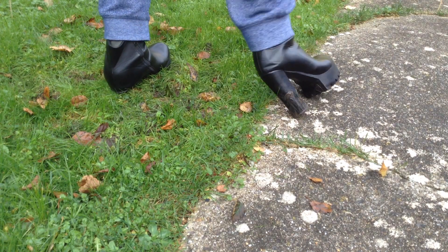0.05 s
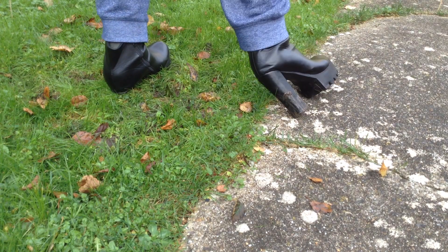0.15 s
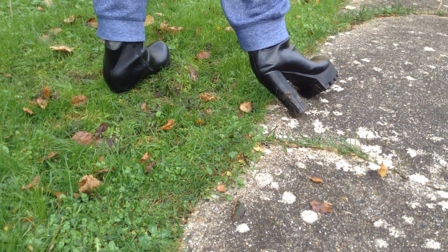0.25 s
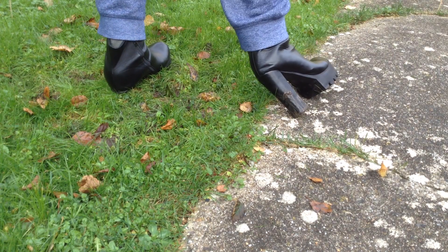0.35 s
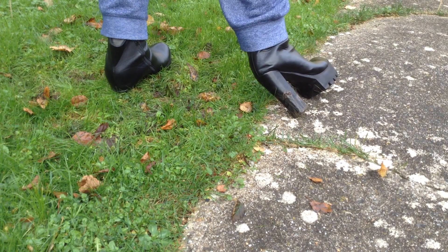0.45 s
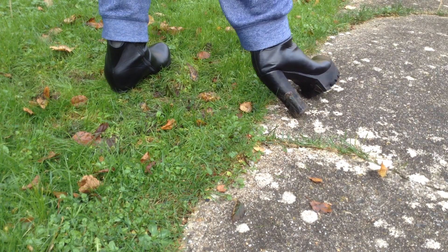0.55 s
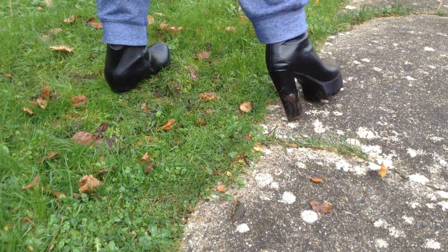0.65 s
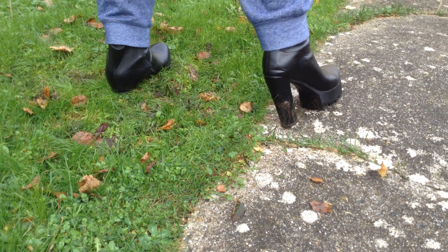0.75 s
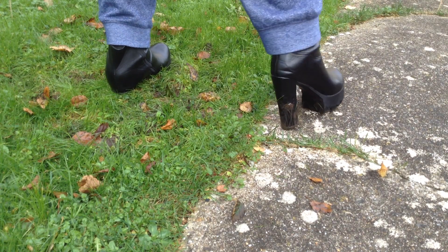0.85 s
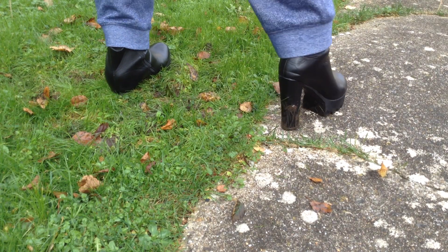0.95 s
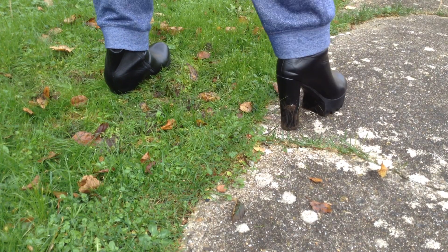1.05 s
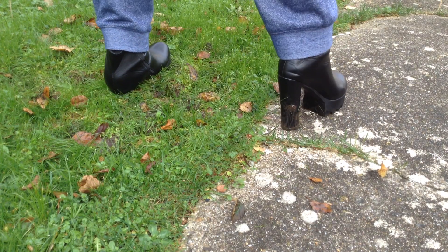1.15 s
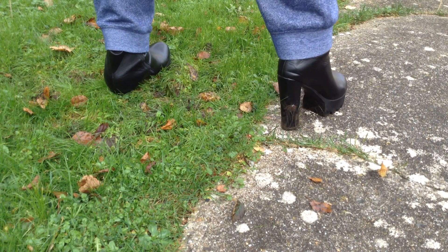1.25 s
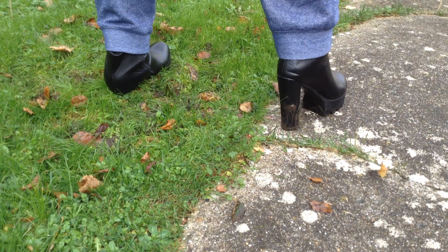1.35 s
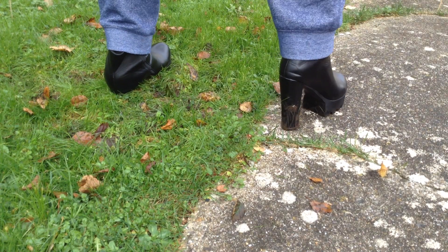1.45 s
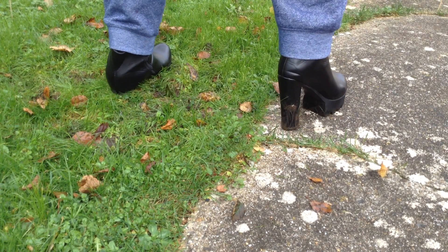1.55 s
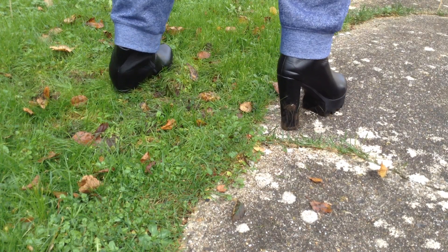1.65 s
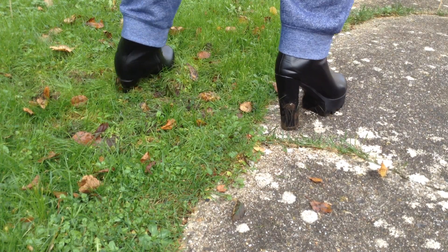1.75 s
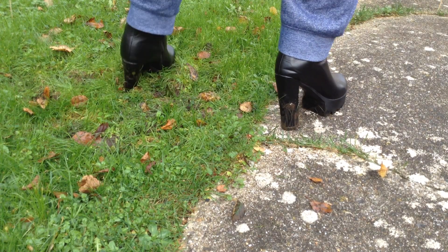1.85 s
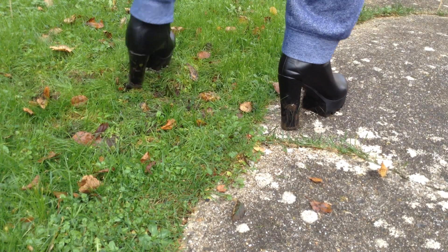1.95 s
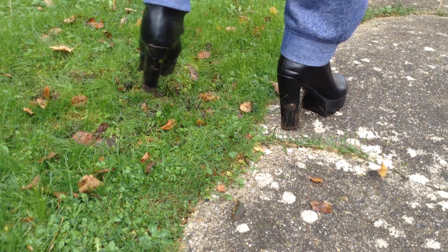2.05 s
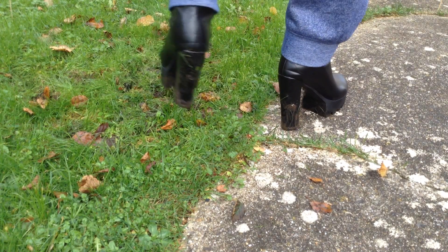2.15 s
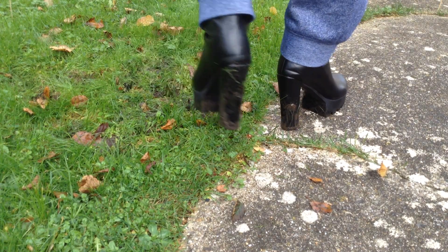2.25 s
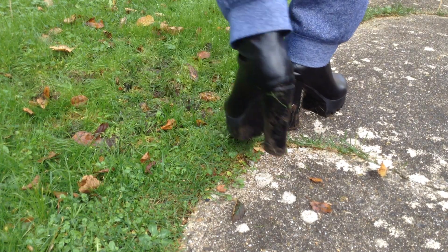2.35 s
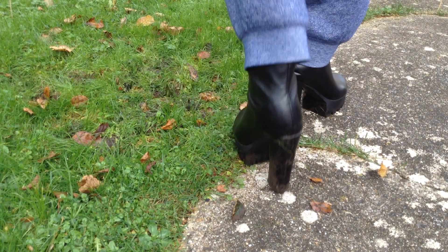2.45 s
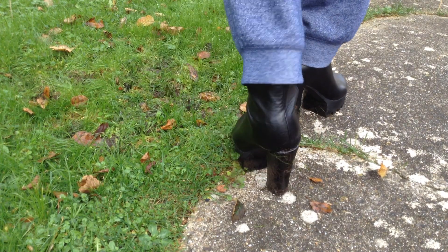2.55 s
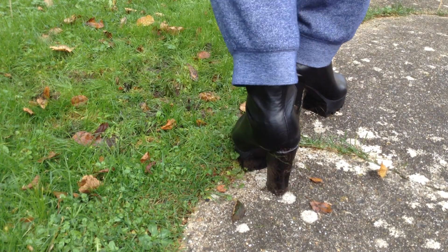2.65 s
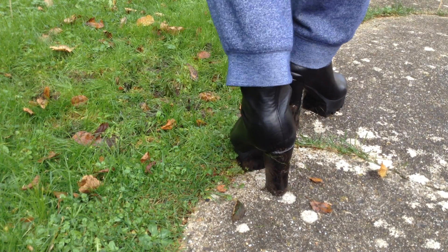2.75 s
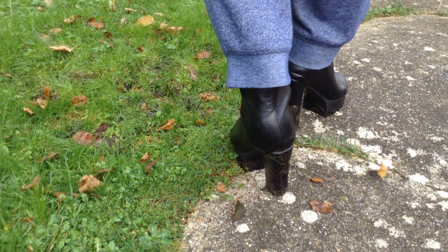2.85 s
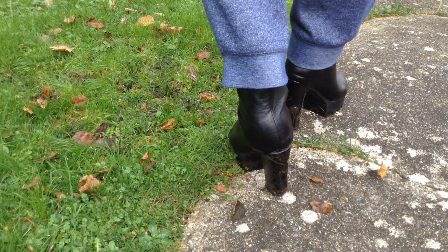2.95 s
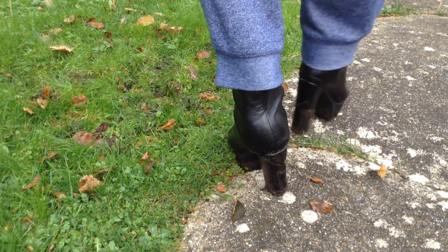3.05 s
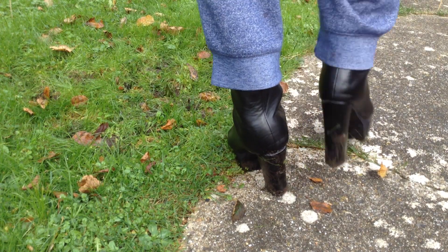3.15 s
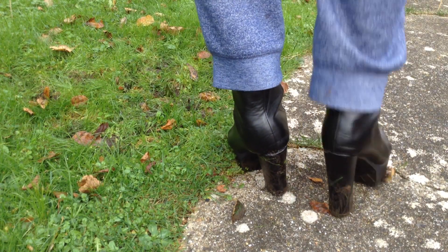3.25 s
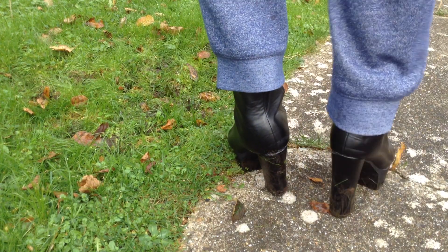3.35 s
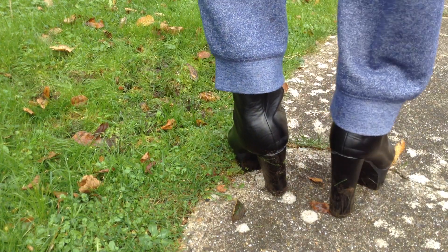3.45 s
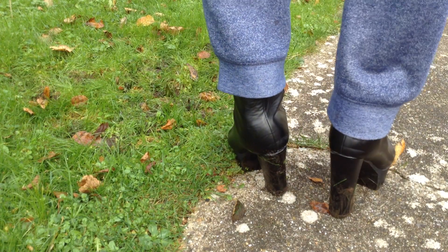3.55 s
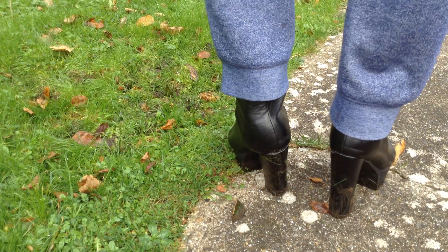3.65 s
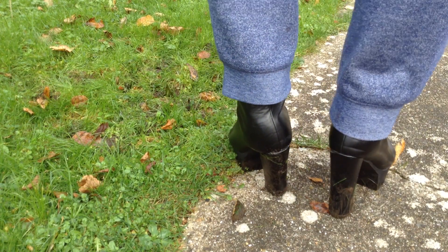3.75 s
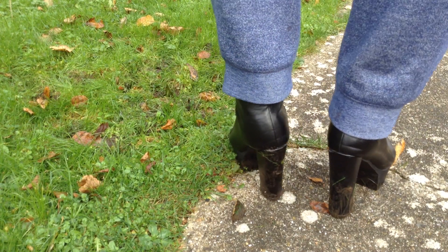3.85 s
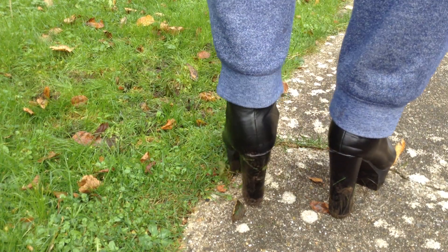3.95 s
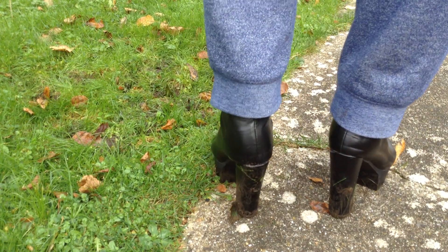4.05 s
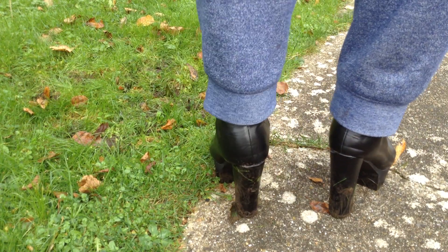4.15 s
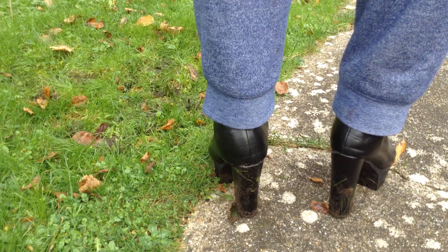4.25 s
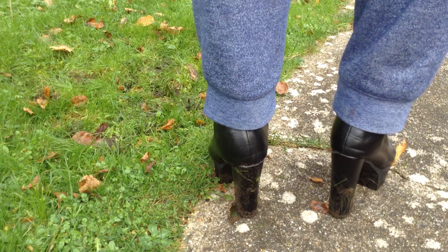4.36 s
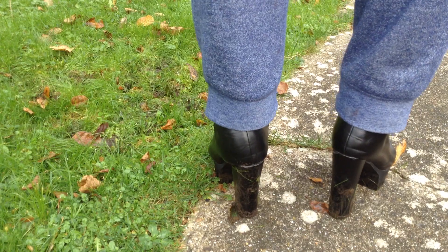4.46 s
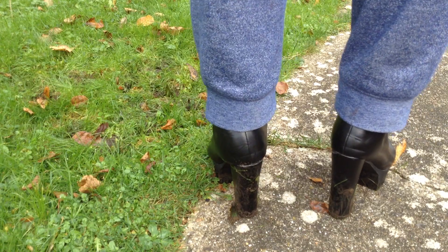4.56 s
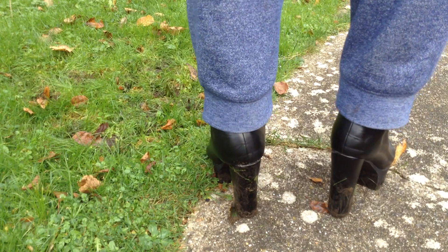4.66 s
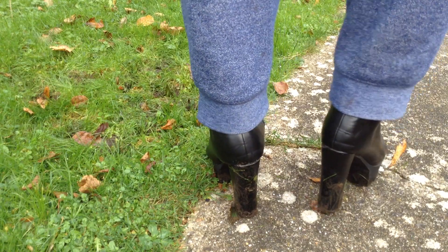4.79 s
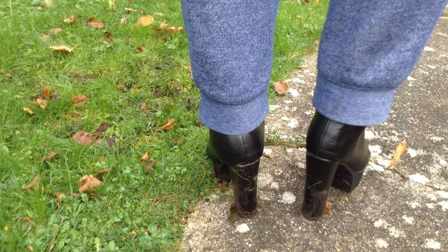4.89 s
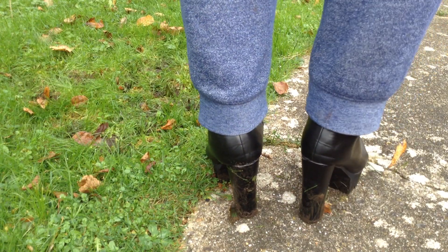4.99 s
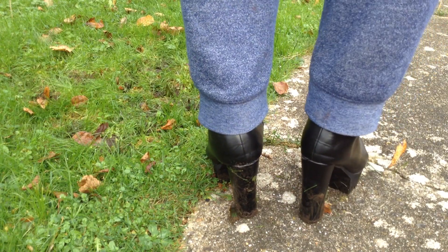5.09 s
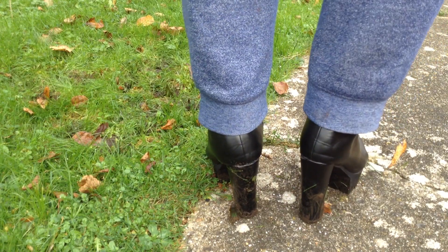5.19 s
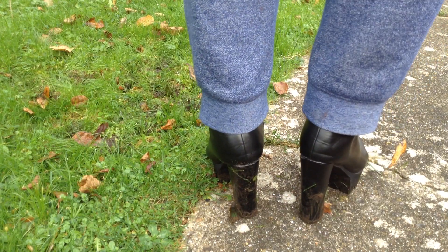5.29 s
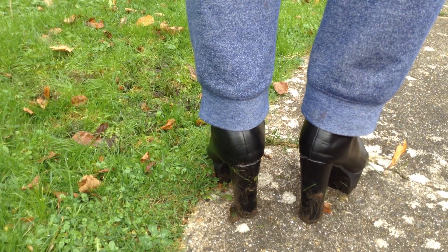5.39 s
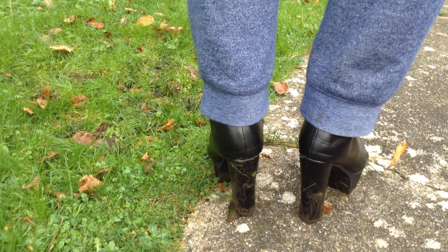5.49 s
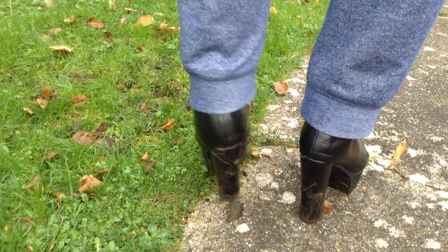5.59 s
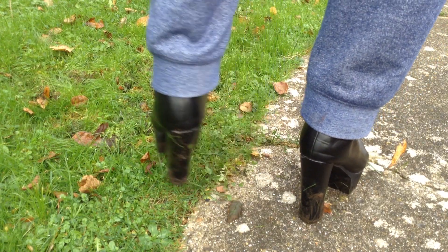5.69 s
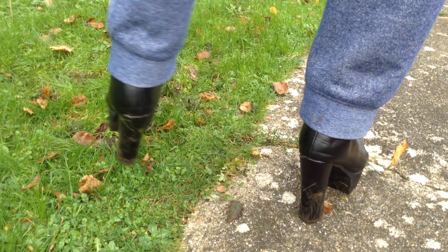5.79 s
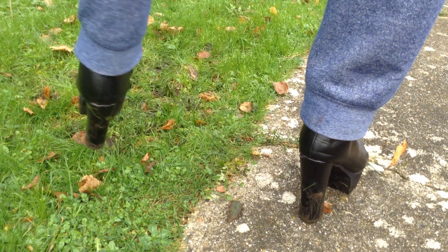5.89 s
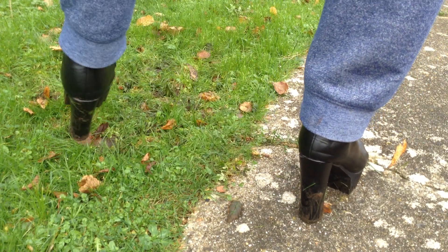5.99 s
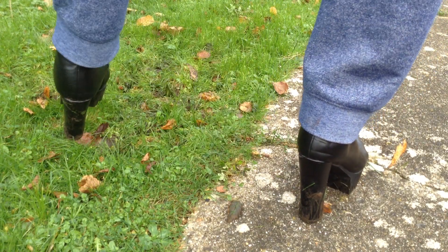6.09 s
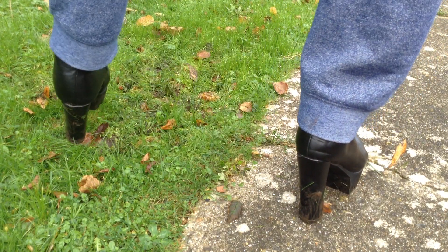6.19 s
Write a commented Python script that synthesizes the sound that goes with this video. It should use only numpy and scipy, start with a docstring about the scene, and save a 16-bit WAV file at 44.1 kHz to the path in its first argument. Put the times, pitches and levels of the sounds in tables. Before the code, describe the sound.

In a quiet garden, heeled platform boots are heard up close, starting with a couple of light knocks and scuffs on concrete. Midway, about four louder, unevenly spaced steps clack down and crunch grit. Softer taps and tiny cracks follow as the weight shifts, then die away. Grass and dry leaves rustle faintly between steps, with a dull cloth swish, a brief scattered echo and a low, steady far-off hum.

```python
"""A garden: block-heeled platform boots take a few slow steps from a lawn onto a concrete path and back.
Heel and sole knock and rock on the slab, each contact ringing the boot's damped modes. Grit cracks
under them in clumps of clicks, grass and leaves rustle in tiny snaps, trouser legs swish dully.
The garden returns a short scattered echo of the steps over a quiet distant hum."""
import sys
import numpy as np
from scipy import signal
from scipy.fft import rfft, irfft
from scipy.io import wavfile

SR = 44100
rng = np.random.default_rng(int(sys.argv[2]) if len(sys.argv) > 2 else 0)


def store_wav(level_fs):
    """Save 16-bit WAV to argv[1]."""
    pcm = np.round(np.clip(np.atleast_2d(level_fs), -1, 1) * 32767)
    wavfile.write(sys.argv[1], SR, pcm.T.astype(np.int16))


N = 274743
IMPACT_T = np.arange(int(.06 * SR)) / SR   # time axis of one impact, s

# boot modes: f/Hz, level/dB, t60/s
BOOT_MODES = [(221, -6, 0.038), (330, 22, .02), (415, 28, .018), (525, 18, 0.026), (686, 4, 0.035),
              (874, 10.5, 0.014), (1057, 11, 0.017), (1213, -9, 0.036), (1730, 2.5, 0.0074),
              (2200, 2, 0.0097), (2672, 8.5, 0.0093), (3180, 1.5, 0.014), (3450, -2, 0.015)]
# landing -> sole thud/dB, hollow body/dB, heel clack/dB, tip click/dB, tip f/Hz, crunch length/s
LANDING_TYPES = {"heel": (-15, -24, 0, -3, 2400, .0017), "toecap": (-12, -3, 0, -3, 1700, .0014),
                 "edge": (-12, -13, 0, -21, 2600, .002), "flat": (-3.5, .5, -4, -25, 2800, .002),
                 "turf": (0, -16, -24, -28, 1800, .002), "scuff": (-10, -5, 0, -6, 2200, .008)}
# ground contacts: t/s, landing, level/dB, extra weight/dB, clack f/Hz, grit/dB, stalks/dB
CONTACTS = [(0.0839, "toecap", -30, 0, 1160, -46, -66), (0.8055, "flat", -49, 11, 720, -56, -69),
            (0.819, "scuff", -39, -2, 1100, -45, -62), (0.829, "flat", -39, -2, 720, -49, -64),
            (0.912, "edge", -51.5, 8, 1050, -56, -65), (0.9295, "flat", -62, 14, 650, -63, -74),
            (1.006, "edge", -56, 9, 900, -50, -48.5), (1.7306, "edge", -53, 0, 1000, -62, -75),
            (1.815, "scuff", -50, -7, 990, -50, -51.5), (2.507, "turf", -46, 0, 650, -75, -80),
            (2.534, "scuff", -53, 4, 1000, -55, -70), (2.5464, "turf", -41, 0, 650, -70, -75),
            (2.5613, "flat", -29, 4, 795, -31, -45), (2.5717, "edge", -20, -6, 780, -42, -43),
            (2.796, "edge", -50, 0, 1100, -66, -75), (2.8182, "heel", -26, 0, 1140, -24.5, -41),
            (3.3394, "turf", -38, 0, 650, -70, -75), (3.3507, "flat", -18.5, -1.5, 560, -30, -50),
            (3.5846, "flat", -37, -6, 680, -42.5, -44.5), (3.8404, "edge", -31.5, -7, 1020, -43.5, -45),
            (3.8918, "heel", -18, -9, 800, -32, -50), (3.9247, "heel", -26.5, 4, 880, -30.5, -50),
            (4.156, "flat", -33, 3, 716, -51, -65), (4.1868, "edge", -32, 0, 940, -41.5, -48),
            (4.5485, "edge", -37.5, 4, 1080, -44.5, -52), (4.69, "heel", -57, -8, 1000, -55, -68),
            (4.805, "flat", -53, -3, 700, -68, -78), (4.9045, "heel", -49.5, -4, 1100, -48.5, -56),
            (4.997, "edge", -51, 4, 900, -55.5, -57), (5.0228, "flat", -32, -3.5, 660, -63, -64),
            (5.036, "edge", -47, 3, 660, -57, -54), (5.512, "scuff", -56, 3, 1000, -50.5, -54)]


def boot_knocks(focus_db_per_octave=17, scatter_db=1.2, detune=.015, part_lag_s=.00025):
    """Each contact rings the boot's modes; the spot that lands sets each part's share."""
    out = np.zeros(N)
    hz, mode_db, t60_s = np.transpose(BOOT_MODES)
    lowest_hz = [160, 310, 560, 1400]   # sole, body, heel, tip: smaller parts radiate less bass
    part = np.searchsorted(lowest_hz[1:], hz)
    radiation = [signal.butter(3, edge, "high", fs=SR, output="sos") for edge in lowest_hz]
    decays = from_db(-60 * IMPACT_T / t60_s[:, None])
    for start_s, landing, level_db, weight_db, clack_hz, *_ in CONTACTS:
        *share_db, tip_hz, _ = LANDING_TYPES[landing]
        part_db = level_db + np.array(share_db) + [weight_db, weight_db, 0, 0]
        favoured_hz = np.choose(part, [hz, hz, clack_hz, tip_hz])
        focus_db = -focus_db_per_octave * np.abs(np.log2(hz / favoured_hz))
        gains = from_db(mode_db + focus_db + scatter_db * rng.standard_normal(len(hz)))
        detuned_hz = hz * (1 + detune * rng.standard_normal(len(hz)))
        rings = gains[:, None] * np.sin(2 * np.pi * np.outer(detuned_hz, IMPACT_T)) * decays
        for k, db in enumerate(part_db):
            radiated = signal.sosfilt(radiation[k], rings[part == k].sum(axis=0))
            lag_s = part_lag_s * (2 - k)   # hard tip first, soft sole last
            add(out, start_s + lag_s, impact_level(radiated, db))
    return out


# spectra of coarse grit, fine grit and stalks: f/Hz, level/dB
COARSE_GRIT_SPECTRUM = [(150, -27), (600, -31), (1200, 0), (2000, -4.5), (3200, 3), (4200, 7), (5300, 4),
                        (6200, -2), (9000, -10), (16000, -81)]
FINE_GRIT_SPECTRUM = [(200, -41), (2000, -56), (5000, -3), (6500, -3.5), (8000, -1.5), (9500, -6),
                      (11000, -16.5), (16000, -28)]
STALK_SPECTRUM = [(200, -77), (5000, -34), (9000, -12.5), (11000, 6.5), (14500, 8.5), (15500, 3.5)]


def crunch(coarse_db, stalks_db, length_s, knee_db=-41.5, tail_db=-24, tail_s=.0075):
    """A clump of grains breaks in milliseconds; a few stragglers follow."""
    fine_db = coarse_db - .6 * max(coarse_db - knee_db, 0)   # heavy contacts shatter mostly coarse grit
    age = 2 * IMPACT_T / length_s
    pressure = age * np.exp(-age) + from_db(tail_db) * np.exp(-IMPACT_T / tail_s)
    spectra = COARSE_GRIT_SPECTRUM, FINE_GRIT_SPECTRUM, STALK_SPECTRUM
    out = 0
    for spectrum, db in zip(spectra, (coarse_db, fine_db, stalks_db)):
        breaks = pressure * grains(len(IMPACT_T), per_s=14000, spread_db=5.5)
        out = out + impact_level(coloured(breaks, spectrum), db)
    return out


# lone grains or dry leaves under a standing boot: t/s, level/dB
LONE_CRACKS = [(0.724, -59), (0.9974, -59), (1.011, -57), (1.778, -65), (3.071, -62), (3.359, -40),
               (3.8685, -58), (3.993, -58), (4.0413, -59), (4.0648, -55), (4.256, -57), (4.546, -50),
               (4.701, -60), (5.004, -52), (5.041, -53)]


def ground_crunches(lead_s=.0003, crack_s=.002):
    """Grit and stalks give way just before the full weight lands; lone grains crack in between."""
    out = np.zeros(N)
    for start_s, landing, *_, grit_db, stalks_db in CONTACTS:
        length_s = LANDING_TYPES[landing][-1]
        add(out, start_s - lead_s - length_s / 2, crunch(grit_db, stalks_db, length_s))
    for start_s, db in LONE_CRACKS:
        add(out, start_s - crack_s / 2, crunch(db, stalks_db=db - 4, length_s=crack_s))
    return out


# boot through grass: t/s, hold/s, level/dB
GRASS_STROKES = [(.69, .02, -62), (1.68, .12, -66), (1.82, .18, -61), (2.56, .06, -52), (2.81, .025, -54),
                 (3.05, .04, -64), (3.34, .02, -59), (3.93, .025, -53), (4.0, .25, -65), (4.70, .02, -61),
                 (5.01, .045, -55)]


def grass_rustle():
    """Tiny snaps of blades and stalks merge into a bright rustle, a few crisper ones on top."""
    spectrum = [(200, -18), (700, -3), (1500, 9.5), (4000, 6), (8000, 5), (12000, 2.5), (15500, 2)]
    snaps = unit_rms(grains(N, per_s=6400, spread_db=5.5))
    crisp = unit_rms(grains(N, per_s=70, spread_db=3))
    rustle = unit_rms(coloured(snaps + .65 * crisp, spectrum))
    return rustle * stroke_envelope(GRASS_STROKES, attack_s=.025, release_s=.03, rest_db=-76)


# weight shifts: t/s, hold/s, level/dB
SWISH_STROKES = [(.695, .02, -53), (.82, .04, -57), (2.40, .16, -57), (2.73, .03, -56), (3.03, .04, -59),
                 (5.02, .025, -56)]
# cloth and turf spectrum: f/Hz, level/dB
SWISH_SPECTRUM = [(30, -26), (60, -2), (90, -10), (150, 4), (250, 0.5), (450, -9), (900, -10),
                  (3000, -50.5)]


def trouser_swish():
    """Trouser legs and soft turf rumble dully as the weight shifts."""
    rumble = unit_rms(coloured(rng.standard_normal(N), SWISH_SPECTRUM))
    return rumble * stroke_envelope(SWISH_STROKES, attack_s=.02, release_s=.03, rest_db=-82)


# near and far echo spectra: f/Hz, level/dB
NEAR_SPECTRUM = [(100, -23), (300, 8.5), (700, 3), (1000, 1.5), (1500, 7), (3000, -3), (5000, 4.5),
                 (9000, 1), (15000, 3)]
FAR_SPECTRUM = [(200, -8), (1200, -1.5), (5000, -14), (12000, -22)]


def garden_echo(steps, near_db=-18, near_t60_s=.21, far_db=-30, far_t60_s=1.0, slap_s=.017, slap_db=-25):
    """Legs, ground and a nearby wall scatter the steps; a fainter, duller echo lingers from farther off."""
    t = np.arange(SR // 2) / SR
    build_up = 1 - np.exp(-(t / .004) ** 4)
    decays = from_db(-60 * t / np.array([[near_t60_s], [far_t60_s]]))
    turn = np.pi * np.arange(N) / SR
    out = np.zeros(N)
    for share in (np.cos(turn), np.sin(turn)):   # two sets of paths alternate as the walker moves
        near, far = rng.standard_normal((2, len(t))) * build_up * decays
        near = from_db(near_db) * unit_energy(near)
        add(near, slap_s, from_db([slap_db]))   # one distinct reflection
        far = from_db(far_db) * unit_energy(far)
        response = coloured(near, NEAR_SPECTRUM) + coloured(far, FAR_SPECTRUM)
        out += signal.fftconvolve(steps * np.abs(share), response)[:N]
    return out


# outdoor hum spectrum: f/Hz, level/dB
HUM_SPECTRUM = [(41, -59), (70, -22), (134, -2), (157, -6.5), (188, -2.5), (269, -6), (403, -12),
                (441, -13), (866, -9.5), (1130, -13), (1360, -14), (1860, -20), (3900, -21.5), (5580, -27),
                (15000, -35.5)]


def distant_hum(level_db=-57.3):
    """Steady far-off noise with little deep bass."""
    return from_db(level_db) * unit_rms(coloured(rng.standard_normal(N), HUM_SPECTRUM))


def stroke_envelope(strokes, attack_s, release_s, rest_db):
    """Each movement swells, holds and dies away over a faint stir at rest."""
    t = np.arange(N) / SR
    power = from_db(rest_db) ** 2
    for start_s, hold_s, db in strokes:
        fade = np.maximum(start_s - t, 0) / attack_s + np.maximum(t - start_s - hold_s, 0) / release_s
        power = power + (from_db(db) * np.exp(-np.minimum(fade, 20))) ** 2
    return np.sqrt(power)


def grains(samples, per_s, spread_db):
    """Random clicks of uneven size and sign."""
    sizes = from_db(spread_db * np.minimum(rng.exponential(1, samples), 4))
    signs = rng.choice([-1, 1], samples)
    return sizes * signs * (rng.random(samples) < per_s / SR)


def coloured(x, spectrum, size=8192):
    """Minimum-phase filter through points of f/Hz, level/dB."""
    hz, db = np.transpose(sorted(spectrum))
    bin_hz = np.maximum(np.arange(size // 2 + 1) * SR / size, 1)
    gains = from_db(np.interp(np.log(bin_hz), np.log(hz), db))
    cepstrum = irfft(np.log(gains))
    cepstrum[1:size // 2] *= 2
    cepstrum[size // 2 + 1:] = 0
    response = irfft(np.exp(rfft(cepstrum)))
    return signal.fftconvolve(x, response)[:len(x)]


def from_db(db):
    """Decibels to gain."""
    return 10 ** (np.asarray(db) / 20)


def unit_energy(x):
    """Scale to a square sum of 1."""
    return x / np.sqrt(np.sum(x ** 2) + 1e-20)


def unit_rms(x):
    """Scale to rms 1."""
    return unit_energy(x) * np.sqrt(len(x))


def impact_level(x, db):
    """Scale to the energy of 10 ms at this level."""
    return unit_energy(x) * np.sqrt(SR // 100) * from_db(db)


def add(track, start_s, sound):
    """Mix a sound into the track."""
    at = int(np.clip(round(start_s * SR), 0, N - 1))
    track[at:at + len(sound)] += sound[:N - at]


def scene():
    """Steps and their echo over rustle, swish and hum; mono."""
    steps = boot_knocks() + ground_crunches()
    return (steps + garden_echo(steps) + grass_rustle() + trouser_swish() + distant_hum())[None, :]


def record(dry, low_hz=42, high_hz=15400):
    """The microphone sheds rumble; the top is cut steeply."""
    low_cut = signal.butter(2, low_hz, "high", fs=SR, output="sos")
    high_cut = signal.ellip(10, .2, 80, high_hz, fs=SR, output="sos")
    return signal.sosfilt(high_cut, signal.sosfilt(low_cut, dry))


dry = scene()
out = record(dry)
store_wav(out)
```